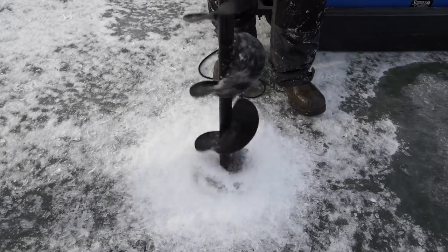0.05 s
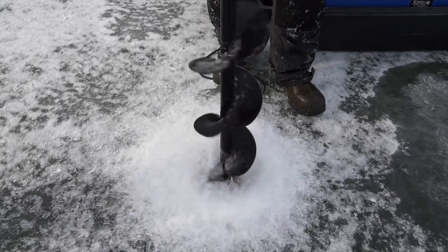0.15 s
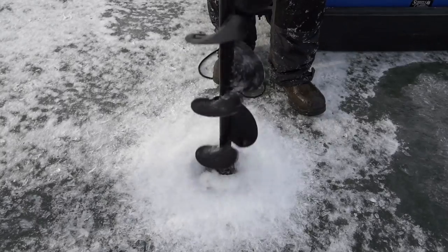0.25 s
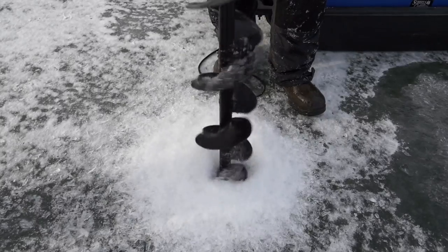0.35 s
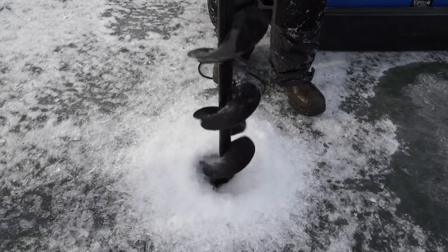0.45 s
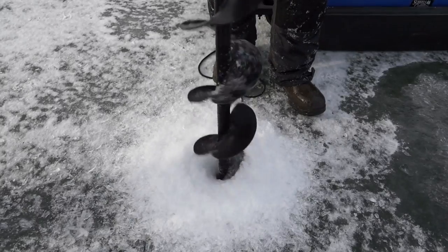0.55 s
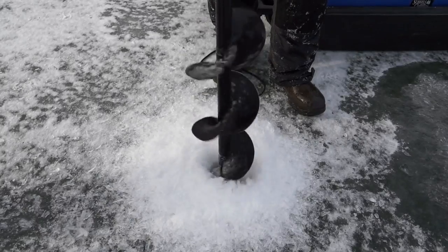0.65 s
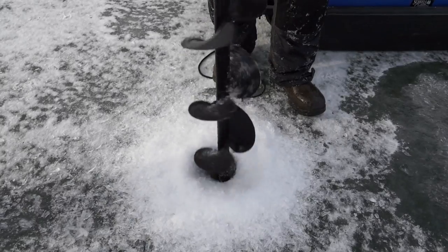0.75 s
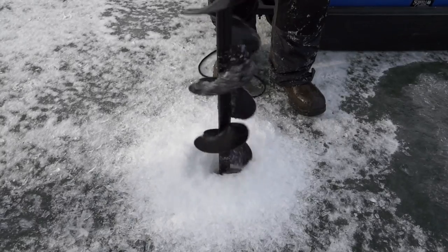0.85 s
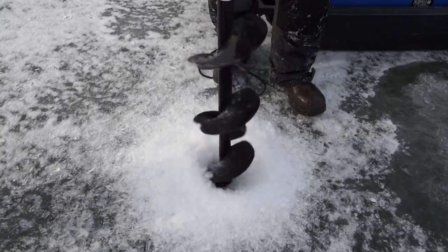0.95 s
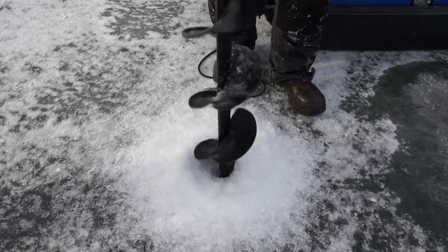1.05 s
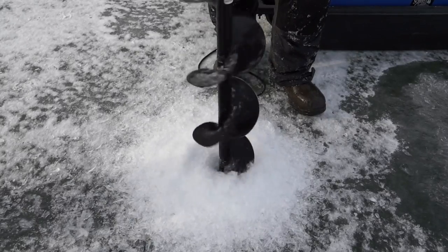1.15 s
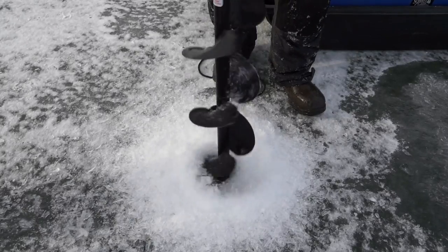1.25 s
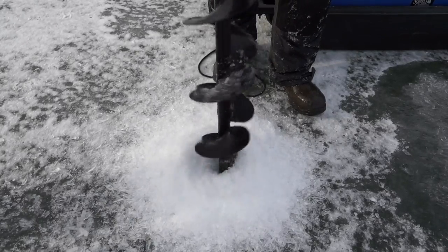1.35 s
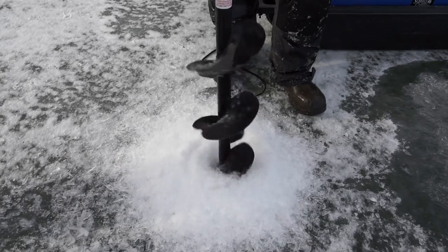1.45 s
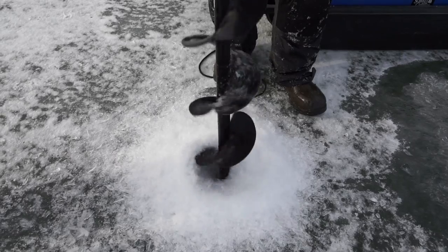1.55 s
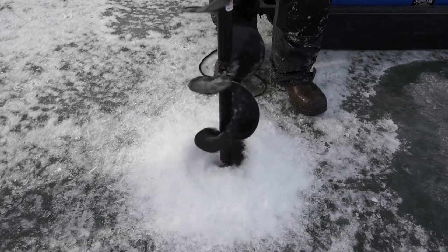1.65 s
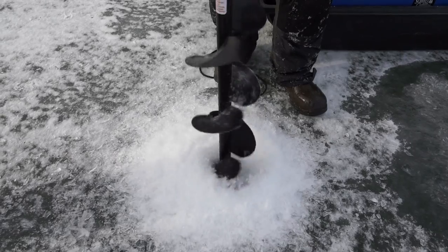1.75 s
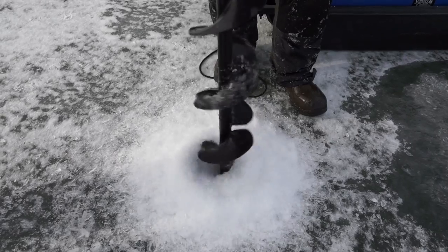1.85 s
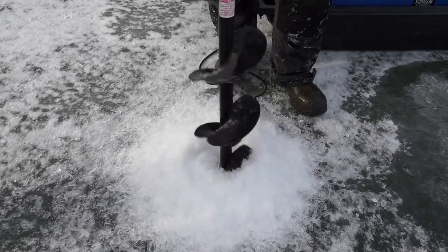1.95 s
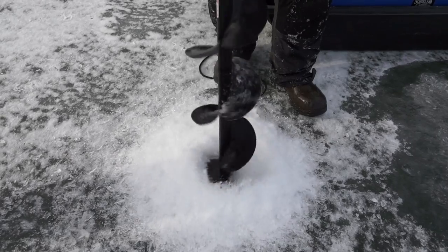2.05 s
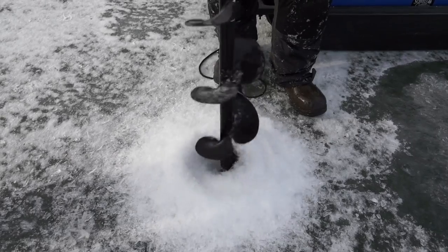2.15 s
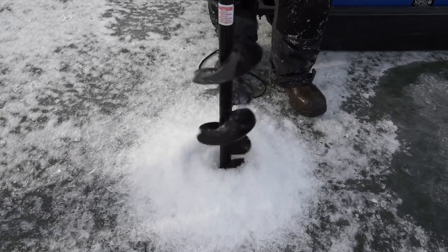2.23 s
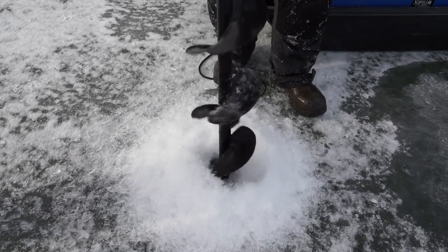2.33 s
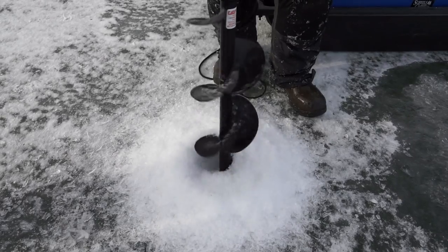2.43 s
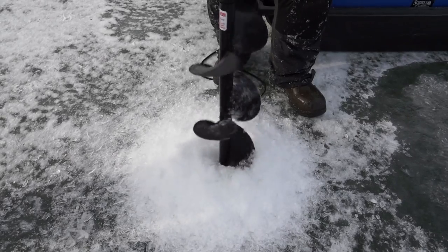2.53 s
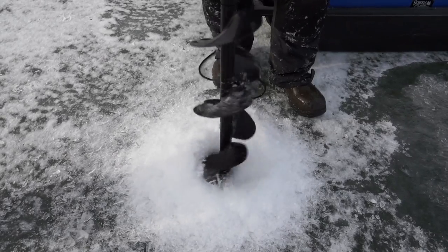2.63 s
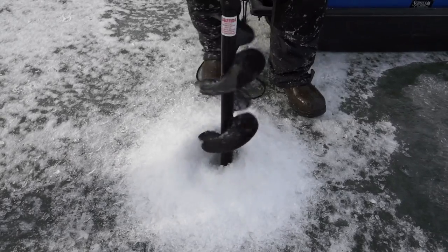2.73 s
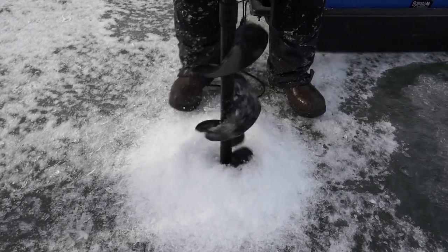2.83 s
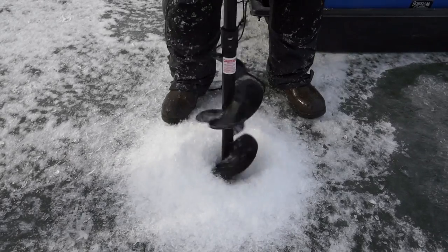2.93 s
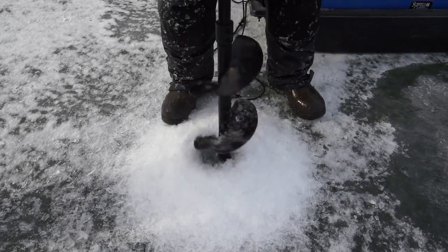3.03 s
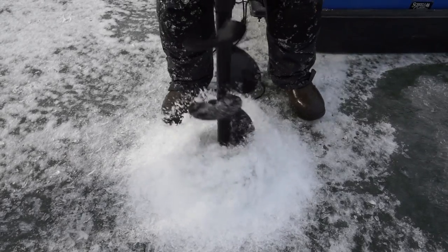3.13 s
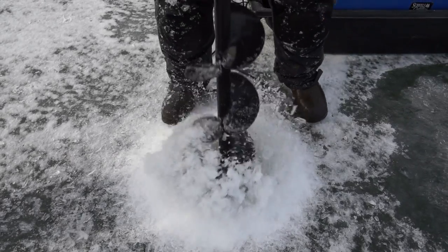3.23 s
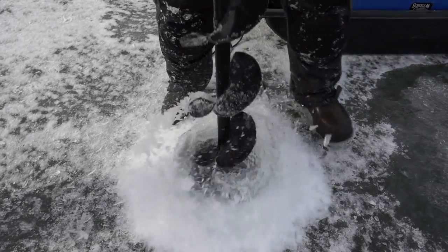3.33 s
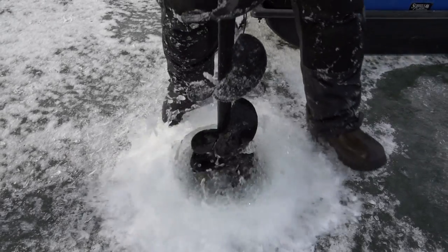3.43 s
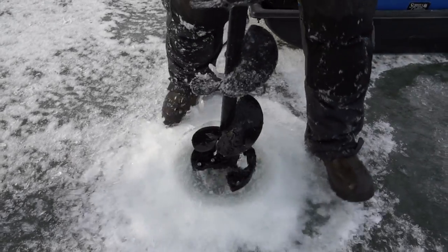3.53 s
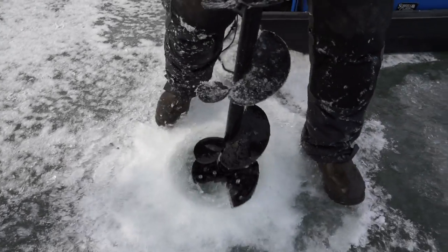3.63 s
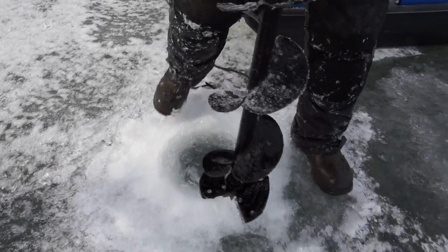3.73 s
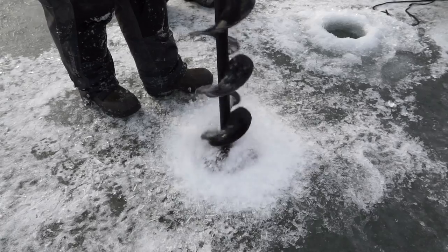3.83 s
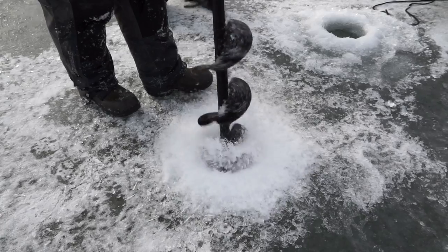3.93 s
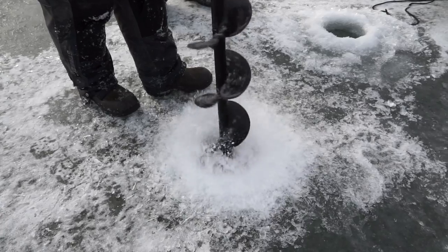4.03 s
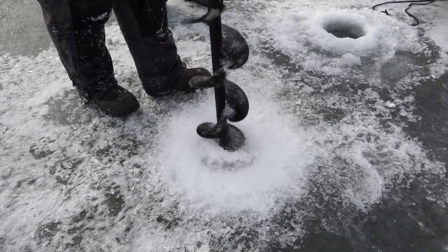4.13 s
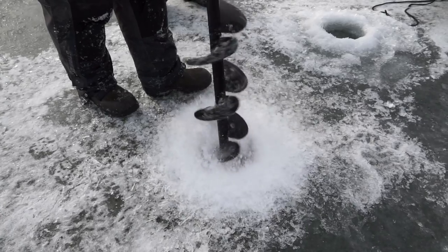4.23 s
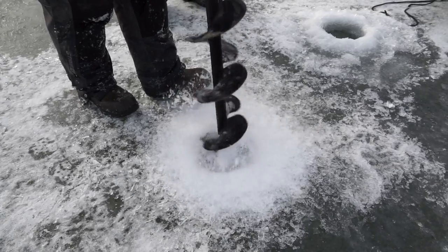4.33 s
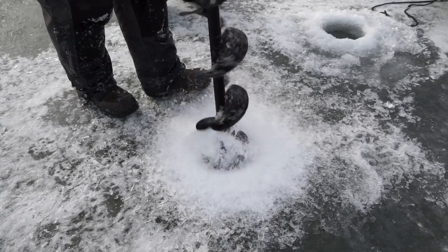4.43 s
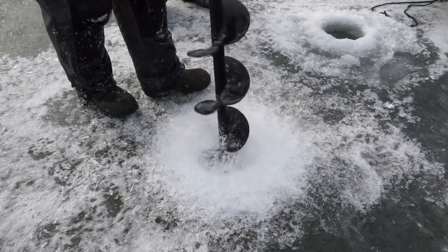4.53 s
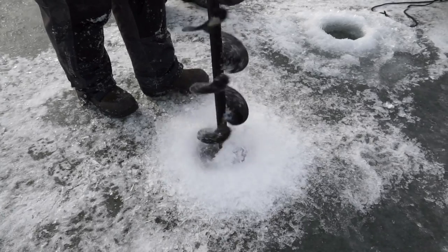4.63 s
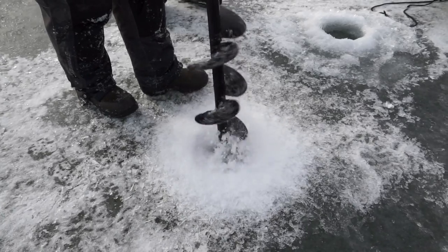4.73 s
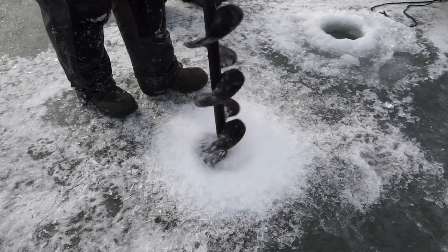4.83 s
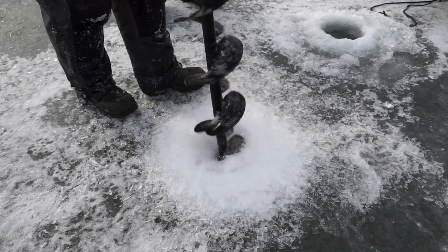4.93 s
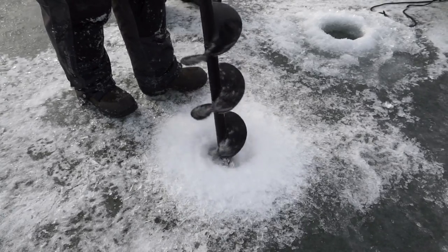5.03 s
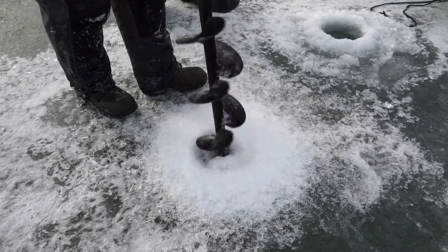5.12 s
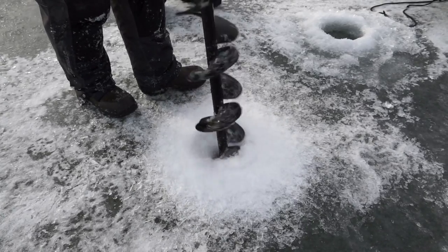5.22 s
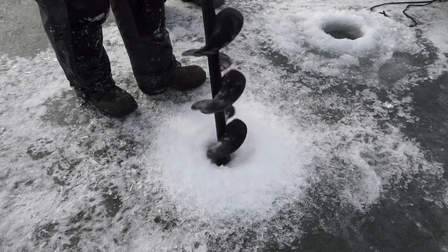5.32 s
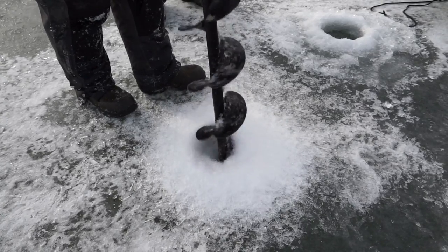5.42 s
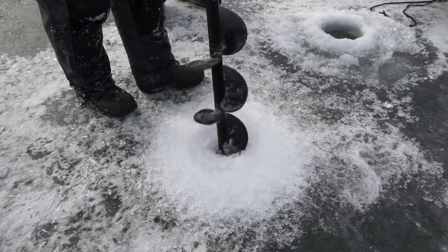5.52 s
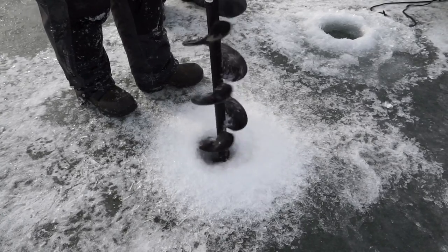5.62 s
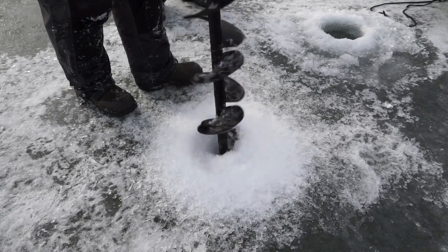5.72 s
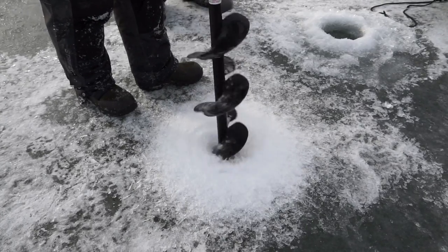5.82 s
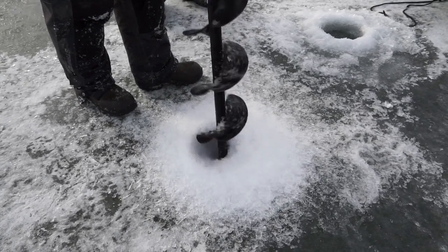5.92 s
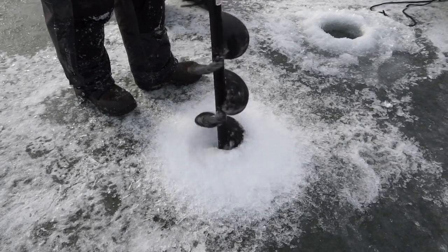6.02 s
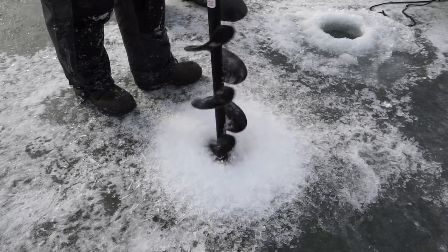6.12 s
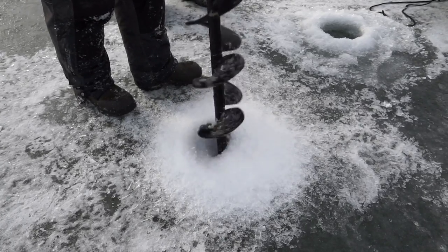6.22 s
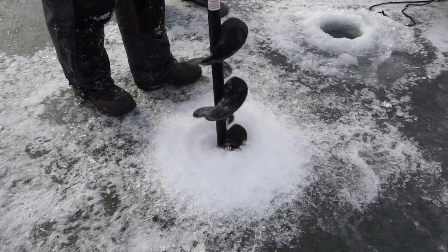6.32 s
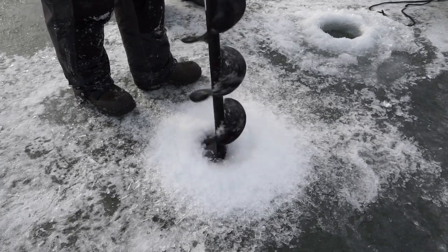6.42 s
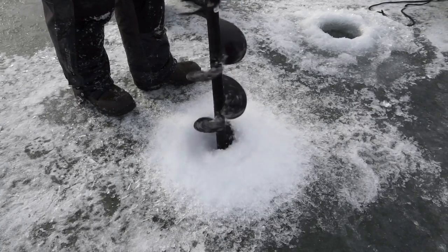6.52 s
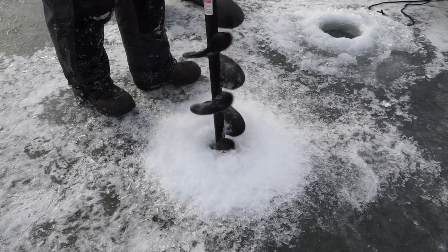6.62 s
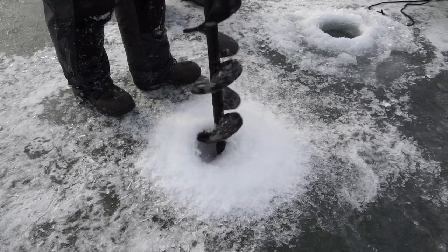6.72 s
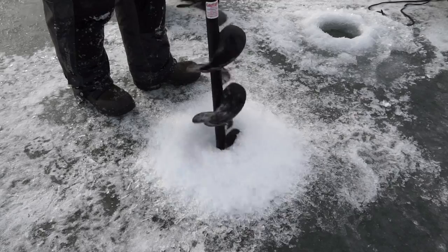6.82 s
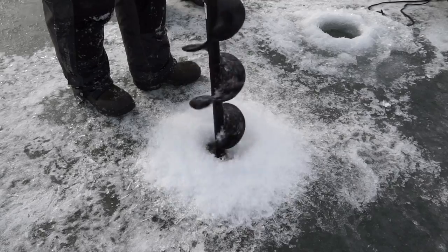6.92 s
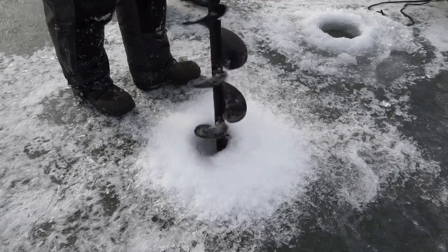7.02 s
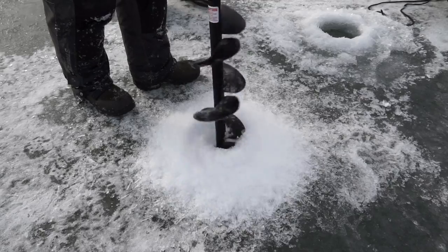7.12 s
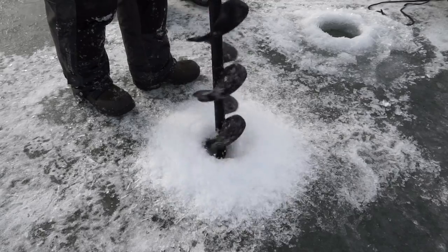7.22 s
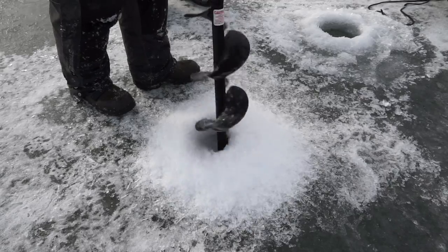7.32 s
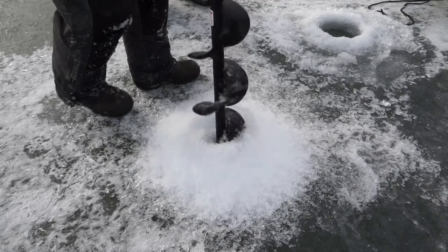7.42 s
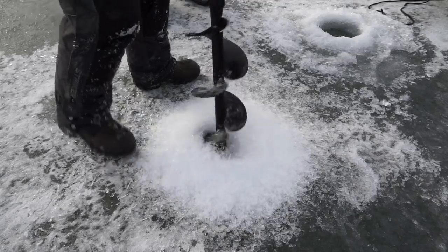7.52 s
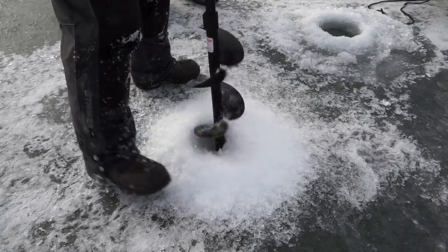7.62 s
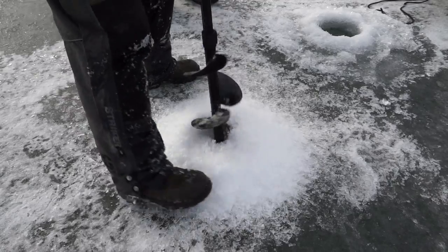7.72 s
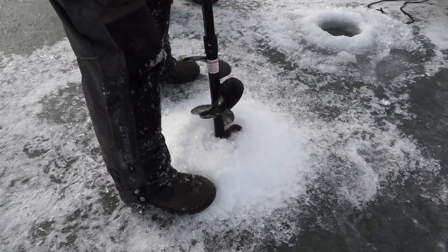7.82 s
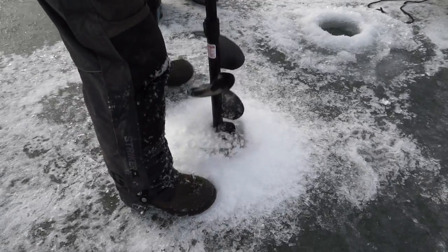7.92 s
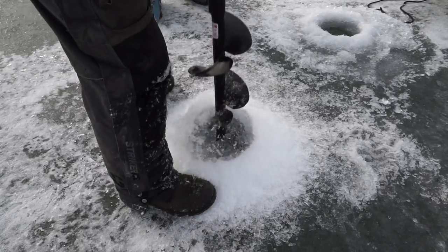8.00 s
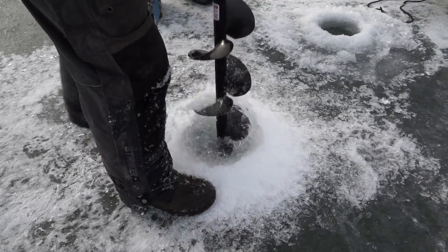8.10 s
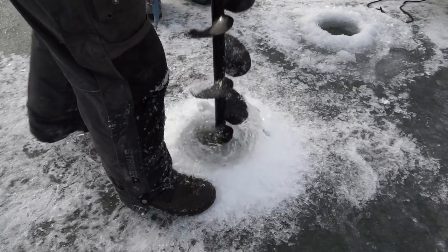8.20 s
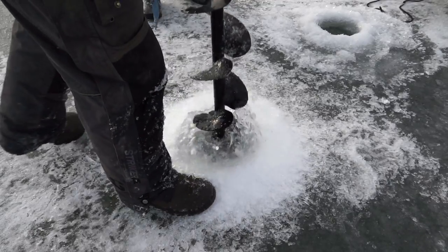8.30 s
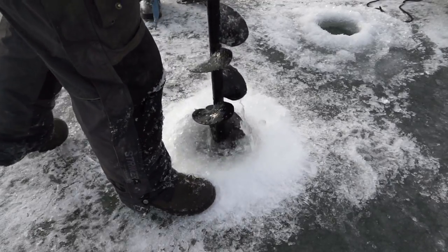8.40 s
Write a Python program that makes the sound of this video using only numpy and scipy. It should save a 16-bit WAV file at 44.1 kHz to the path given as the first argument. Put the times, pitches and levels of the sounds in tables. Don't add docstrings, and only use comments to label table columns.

```python
import sys
import numpy as np
from scipy import signal
from scipy.io import wavfile

SR = 44100
rng = np.random.default_rng(int(sys.argv[2]) if len(sys.argv) > 2 else 0)


def convert_level_to_amplitude(level_db):
    exponent = np.asarray(level_db, float) / 20
    return 10 ** exponent


def wav_out(sig):
    wavfile.write(sys.argv[1], SR, np.round(np.clip(np.atleast_2d(sig).T, -1, 1) * 32767).astype(np.int16))


N = 373085


def rms_one(x):
    return x / np.sqrt(np.mean(x ** 2) + 1e-20)


def in_time(rows, fade_s=.012):
    s, *columns = np.transpose(rows)
    part = slice(max(int((s[0] - fade_s) * SR), 0), min(int((s[-1] + fade_s) * SR), N))
    t = np.arange(part.start, part.stop) / SR
    since_start = t - s[0] + (s[0] < fade_s)
    gate = np.clip(np.minimum(since_start, s[-1] - t) / fade_s / 2 + .5, 0, 1)
    return part, np.sqrt(gate), [np.interp(t, s, c) for c in columns]


def at_hz(points, hz):
    table_hz, value = np.array(points).T
    return np.interp(np.log(hz), np.log(table_hz), value)


def coarse(rate_hz, size):
    r = np.exp(-32 * np.pi * rate_hz / SR)
    slow = signal.lfilter([1], [1, -2 * r, r * r], rng.standard_normal(size // 16 + 3001))[3000:]
    return rms_one(slow - slow.mean())


def drift(rate_hz, size):
    slow = coarse(rate_hz, size)
    return np.interp(np.arange(size) / 16, np.arange(len(slow)), slow)


def bumps(t, rows, width_s):
    s, *columns = np.transpose(rows)
    return np.array(columns) @ np.exp(-.5 * ((t - s[:, None]) / width_s) ** 2)


def resonance(x, hz, t60_s):
    r, w = convert_level_to_amplitude(-60 / (t60_s * SR)), 2 * np.pi * hz / SR
    return signal.lfilter([.5, 0, -.5], [1, -2 * r * np.cos(w), r * r], x + 1e-18)


# frequency in Hz, left minus right in dB.
LEAN_DB = [(60, 5), (150, 1.5), (380, -2), (950, -2.5), (2380, -6), (5980, -4.0), (15000, -9)]


def leaned(x, hz):
    return x * convert_level_to_amplitude(at_hz(LEAN_DB, hz) / 2 * np.array([[1], [-1]]))


# blades touch in s, bite-in time in s, ice gives in s, through in s, grind in dB.
HOLES = [
    (-.2, 0.085, 2.86, 2.9, -18),
    (3.862, 0.057, 7.5, 7.643, -18),
]
# thud, rumble, hiss at the top in dB, then their change to the bottom in dB.
VOICING_DB = [
    (-46, -17, -9.5, 20.8, 3.1, -0.74),
    (-39, -16, -8.5, 10, 2.2, -1.3),
]
# thud, rumble, grind, hiss in dB.
GIVE_DB = [
    (3, 8.9, -9, -4),
    (12, 5.8, -9.5, -7.5),
]
# time in s, jolt in dB, extra thud in dB.
CATCHES = [(.07, 7, 9), (.32, 7.5, 5), (.58, 4, 3), (.83, 5.5, 3), (1.05, 2.5, 0), (1.34, 4, 1),
           (1.6, 2, 2), (1.95, 2, -1), (2.25, 5, -2), (2.49, 3, 4), (2.68, 3, 4), (4.21, 6.5, 10),
           (4.38, 9, 11), (4.58, 9, 6), (4.9, 3, 0), (5.139, 3.5, -1), (5.36, 4.5, 2), (5.47, 0, 12.5),
           (5.62, 1.5, -6), (5.869, 2.5, 3), (6.06, 0, 5), (6.31, 1.5, -1), (6.552, 0, -1),
           (6.92, 4.5, 2.5), (7.1, 3, 4)]
# time in s, level change in dB.
SLACKS = [(.26, -1.5), (.9, -1.5), (1.17, -1.5), (1.42, -1.5), (1.87, -0.5), (2.36, 1), (3.93, -3.5),
          (4.0, -2), (4.07, -2), (4.42, -1.5), (4.67, -4), (4.95, -1.5), (5.3, -1.5), (6.85, -1)]
CATCH_S, CATCH_SHARE = 0.041, (0.46, 1.0, 0.14, 0.072)
SLACK_S, SLACK_SHARE = 0.032, (1.8, 0.92, 1, 1.3)
DEEPEN_POWER = 1.2
RIM_HISS_DB, RIM_S = 3.5, 0.27


def blades(hole):
    start, bite_s, give, end, grind_db = HOLES[hole]
    t = np.arange(max(start, 0), end, .005)
    depth = np.clip((t - start) / (give - start), 0, 1) ** DEEPEN_POWER
    top_db, change_db = np.insert(np.reshape(VOICING_DB[hole], (2, 3)), 2, 0, axis=1)
    jolt_db, thud_db = bumps(t, CATCHES, CATCH_S)
    slack_db = bumps(t, SLACKS, SLACK_S)[0]
    bite_db = -30 * np.exp(-(t - start) / bite_s * 2.8)
    db = grind_db + bite_db + top_db[:, None] + np.outer(change_db, depth)
    db += np.outer(CATCH_SHARE, jolt_db) + np.outer(SLACK_SHARE, slack_db)
    db += np.outer(GIVE_DB[hole], np.clip((t - give) / (end - give), 0, 1))
    db[0] += thud_db
    db[3] += RIM_HISS_DB * np.exp(-(t - start) / RIM_S)
    return np.c_[t, db.T]


# frequency in Hz, left-right likeness from 0 to 1.
LIKENESS = [(60, 0.88), (150, 0.98), (380, 0.96), (950, 0.95), (2380, 0.99), (5980, 0.39), (15000, 0.17)]
GROUP_HZ = [240, 800, 3200]
FLICKER_PER_S = 24


def grains(rows, colour, ring_db, per_s, spread_db, bed, surge_db, patchy_db):
    part, gate, levels_db = in_time(rows)
    size = len(gate)
    cracks = convert_level_to_amplitude(spread_db * np.minimum(rng.exponential(1, size), 4)) * (rng.random(size) < per_s / SR)
    white = rng.standard_normal((2, 2, size)) * (bed + rms_one(cracks))
    surge = surge_db * (drift(7.2, size) + 0.6 * drift(33, size))
    groups = np.zeros((4, 2, size))
    edges = 50 * 2 ** np.arange(0, 8.6, 1 / 3)
    for k, (low, high) in enumerate(zip(edges, edges[1:])):
        band = signal.butter(2, [low, high], "band", fs=SR, output="sos")
        mid, side = signal.sosfilt(band, white[k % 2])
        hz = np.sqrt(low * high)
        alike = np.clip(at_hz(LIKENESS, hz), 0, 1)
        pair = np.sqrt(1 + alike) * mid + np.sqrt(1 - alike) * side * [[1], [-1]]
        band_db = at_hz(colour, hz) + patchy_db * drift(FLICKER_PER_S, size)
        groups[np.searchsorted(GROUP_HZ, hz)] += leaned(pair * convert_level_to_amplitude(band_db), hz)
    shaft = rms_one(resonance(white[0, 0], hz=1108.5, t60_s=0.075))
    groups[2] += leaned(shaft, 910) * convert_level_to_amplitude(ring_db) * np.std(groups[2])
    mixed = sum(convert_level_to_amplitude(db) * g / np.std(g.mean(axis=0)) for db, g in zip(levels_db, groups))
    out = np.zeros((2, N))
    out[:, part] = gate * convert_level_to_amplitude(surge) * mixed
    return out


def squeaks(rows, level_db, per_s, cycles, low_hz, high_hz):
    part, gate, levels_db = in_time(rows)
    out, size = np.zeros((2, N)), len(gate)
    born = (rng.random(size) < per_s / SR) * convert_level_to_amplitude(2.1 * rng.standard_normal(size))
    dealt = rng.integers(0, 20, size)
    for k, hz in enumerate(np.geomspace(low_hz, high_hz, 20)):
        ring = resonance(born * (dealt == k), hz, cycles / hz)
        ring = resonance(ring, hz, cycles / hz)
        out[:, part] += leaned(ring * hz, hz)
    out[:, part] *= convert_level_to_amplitude(levels_db[2] + level_db) * gate / np.std(out[:, part].mean(axis=0))
    return out


# frequency in Hz, density in dB per Hz.
CUT_COLOUR = [
    [(35, -86), (60, -46), (231, -32.5), (413, -16.5), (889, -13.5), (999, -5), (1120, -2.5), (1350, -9.5),
     (2310, -8.5), (3190, -20.5), (4030, -21), (5450, -26.5), (9510, -32), (15500, -47)],
    [(35, -75), (60, -36), (413, -9.5), (585, -3), (756, -9), (1170, -4), (1960, -5), (2150, -4),
     (2980, -14.5), (3340, -10), (4120, -17), (4960, -14), (7030, -17.5), (15500, -33)],
]
RING_DB = (-9.0, -18.0)
SQUEAK_DB = (-20, -13)


def cutting(hole):
    levels = blades(hole)
    grind = grains(levels, CUT_COLOUR[hole], RING_DB[hole], per_s=2000, spread_db=2.5, bed=2.15,
                   surge_db=0.76, patchy_db=1.58)
    return grind + squeaks(levels, SQUEAK_DB[hole], per_s=260, cycles=42.0, low_hz=1000, high_hz=2582)


# peak in dB, swell up to the peak in dB, share of depth where it peaks.
WHINE = [
    (-23.0, 0, 0.34),
    (-29.5, 7.5, 0.76),
]
TURNS_PER_S, TURN_DB, TURN_PHASE = 4.0, (1.0, 1.5), (0.23, 0.32)


def load(hole):
    peak_db, swell_db, top = WHINE[hole]
    depth = np.linspace(0, 1, 200)
    start, end = SPEED[hole][0][0], SPEED[hole][-1][0]
    away = np.where(depth < top, (top - depth) / top, (depth - top) / (1 - top) * 0.97)
    t = start + (end - start) * depth
    swing_db = TURN_DB[hole] * np.sin(2 * np.pi * (TURNS_PER_S * t + TURN_PHASE[hole]))
    return np.c_[t, peak_db - swell_db * away ** 2.5 + swing_db]


# time in s, teeth per s.
SPEED = [
    [(0, 588), (.4, 587), (.5, 594), (.82, 591), (.92, 580), (1.15, 585), (1.55, 578), (1.9, 581),
     (2.15, 573), (2.45, 573), (2.75, 584), (2.89, 598)],
    [(3.9, 593), (4.45, 586), (4.82, 600), (5.05, 586), (5.28, 582), (5.46, 597), (5.7, 592), (5.86, 584),
     (6.3, 584), (6.55, 589), (6.9, 594), (7.02, 581), (7.15, 591), (7.38, 579), (7.48, 606), (7.63, 615)],
]
SAG_PER_DB = 1.3


def speed(hole):
    s, teeth = np.transpose(SPEED[hole])
    t = np.arange(s[0], s[-1] + .004, .005)
    sag = SAG_PER_DB * bumps(t, CATCHES, CATCH_S)[0]
    return np.c_[np.minimum(t, s[-1]), np.interp(t, s, teeth) - sag]


# multiple of the tooth rate, first hole in dB, second hole in dB, free in dB.
MESH = [(1, -21.5, -8, -13), (2, -0.5, 2.5, -3), (3, -9, -5, 2.5), (4, -9, -4, -4.5), (5, -12, -1.5, -7),
        (6, -13.5, -25, -13), (7, -17.5, -4, -12), (8, -19.5, -26, -22), (10, -21.5, -26, -10.5),
        (12, -25, -12.5, -20), (14, -30, -42, -36)]
WHEEL_TEETH = 40
THROBBING, THROB = 7, .8


def gears(teeth_rows, rows, column, wobble, blur_hz, rough, runout, pinion, patchy_db, spread):
    part, gate, (whine_db,) = in_time(rows)
    teeth, size = in_time(teeth_rows)[2][0], len(gate)
    turn = 2 * np.pi * np.cumsum(teeth * (1 + wobble * drift(22, size))) / SR
    coarse_turn = np.r_[turn, turn[-16:]][::16][:size // 16 + 1]
    wheel = np.exp(1j * np.outer(np.arange(1, 5), coarse_turn / WHEEL_TEETH))
    out = np.zeros((2, N))
    for row in MESH:
        k = row[0]
        depth = runout * np.array([k - 1, .5 * k, pinion / runout, 0.44 * k])
        up, down = depth * np.exp(2j * np.pi * rng.random((2, 4)))
        blur = coarse(blur_hz, size) + 1j * coarse(blur_hz, size)
        smear = 1 + .5 * up @ wheel + down @ wheel.conj() + rough * (abs(k - 2) + .6) * blur
        smear *= convert_level_to_amplitude(patchy_db * min(abs(k - 2), 4) * coarse(15, size))
        smear *= 1 + THROB * (k == THROBBING) * wheel[0].real
        apart = np.exp(1j * spread * k * coarse(blur_hz, size) * np.array([[1], [-1]]))
        shape = apart * smear / np.sqrt(np.mean(np.abs(smear) ** 2))
        shape = np.repeat(shape, 16, axis=1)[:, :size]
        carrier = np.exp(1j * k * turn) * convert_level_to_amplitude(row[column] + whine_db) * gate
        line = np.sqrt(2) * np.real(shape * carrier)
        out[:, part] += leaned(line, k * teeth.mean())
    return out


WOBBLE, RUNOUT = (.003, .007), (.15, .12)
BLUR_HZ, ROUGH, LINE_PATCHY_DB = (35, 70), (.12, .27), (.45, .35)


def loaded_whine(hole):
    return gears(speed(hole), load(hole), 1 + hole, wobble=WOBBLE[hole], blur_hz=BLUR_HZ[hole],
                 rough=ROUGH[hole], runout=RUNOUT[hole], pinion=.35, patchy_db=LINE_PATCHY_DB[hole], spread=.04)


# time in s, teeth per s.
FREE_SPEED = [
    [(2.89, 686), (3.1, 686), (3.22, 672)],
    [(7.65, 692), (7.82, 693), (7.91, 684)],
]
# time in s, level in dB.
FREE_DB = [
    [(2.89, -31), (2.99, -34), (3.02, -26), (3.11, -29.5), (3.15, -43), (3.22, -50)],
    [(7.65, -40), (7.71, -33.5), (7.81, -34), (7.86, -42), (7.91, -43)],
]


def free_whine(hole):
    return gears(FREE_SPEED[hole], FREE_DB[hole], 3, wobble=.004, blur_hz=90, rough=.35, runout=.12,
                 pinion=.4, patchy_db=1.3, spread=.04)


# time in s, level in dB.
CHURN_DB = [
    [(2.89, -29), (2.98, -27), (3.05, -23), (3.28, -28.5), (3.41, -28.5), (3.49, -42.5), (3.61, -35),
     (3.8, -42), (3.88, -40)],
    [(7.64, -29.5), (7.885, -27.5), (7.92, -32), (8.04, -33.5), (8.12, -29.5), (8.22, -32.5), (8.33, -38),
     (8.378, -28), (8.46, -47)],
]
# time in s, level change in dB.
LULLS = [(3.21, 2), (3.24, -5), (7.965, -3), (8.047, -3), (8.097, -7), (8.143, -10), (8.305, -3), (8.34, 4)]
# from s, to s, thud in dB, slosh gain in dB.
PUMPING = [
    (3.2, 3.44, -42.5, 5.5),
    (8.04, 8.37, -45, 7.5),
]
# until s, level in dB, drain in dB per s, trickle in dB.
RUNOFF = [
    (3.67, -38, 60, -47),
    (7.89, -38, 200, -45.5),
]
# time in s, level over the run-off in dB.
SPLASHES = [(3.05, 5), (3.3, -6), (3.54, 1.5), (3.65, 5.5), (8.062, 6), (8.375, 9), (3.47, -0.5)]
LULL_S, SPLASH_S, PUMP_EDGE_S = 0.0058, 0.012, 0.013
THUD_BELOW_DB, SLOSH_BELOW_DB = -19.5, -8.5


def water(hole):
    s, churn_db = np.transpose(CHURN_DB[hole])
    t = np.arange(s[0], s[-1], .004)
    churn = np.interp(t, s, churn_db) + bumps(t, LULLS, LULL_S)[0]
    start, end, thud_db, slosh_db = PUMPING[hole]
    pumped = np.clip(np.minimum(t - start, end - t) / PUMP_EDGE_S + .5, 0, 1)
    thud = (churn + THUD_BELOW_DB) * (1 - pumped) + thud_db * pumped
    slosh = churn + SLOSH_BELOW_DB + slosh_db * pumped
    until, spray_db, drain, trickle_db = RUNOFF[hole]
    draining = spray_db - drain * np.maximum(t - until, 0)
    spray = np.maximum(draining, trickle_db) + bumps(t, SPLASHES, SPLASH_S)[0]
    return np.c_[t, thud, slosh, churn, spray]


# frequency in Hz, density in dB per Hz.
SLUSH_COLOUR = [
    [(35, -79), (60, -59), (423, -15), (533, -29), (1100, -2.5), (1630, -11), (1870, -5.5), (3120, -17),
     (15500, -24.5)],
    [(35, -78.5), (60, -56), (210, -16), (486, -4.5), (705, -10.5), (1450, -11), (1550, -8), (1960, -19.5),
     (15500, -33)],
]
CRUNCH_DB = (-9, -5)


def slush(hole):
    levels = water(hole)
    wash = grains(levels, SLUSH_COLOUR[hole], RING_DB[hole] - 1.5, per_s=900, spread_db=3.5, bed=2.2,
                  surge_db=1.5, patchy_db=1.5)
    crunch = squeaks(levels, CRUNCH_DB[hole], per_s=160, cycles=13.5, low_hz=655, high_hz=2880)
    return convert_level_to_amplitude(0.5) * wash + crunch


# time in s, peak in dB,
# centre in Hz, tick in dB.
SLAPS = [(2.870, -7, 1050, -23.5), (3.074, -13.5, 2020, -21), (3.13, -12, 1070, -24),
         (3.17, -12, 1130, -21), (3.218, -7.5, 1150, -14), (3.248, -18, 1120, -16), (3.267, -13, 1230, -26),
         (3.288, -20, 999, -10), (3.298, -15, 1120, -28), (3.321, -21, 1120, -21), (3.385, -14, 1090, -24),
         (3.406, -9.5, 1090, -22), (3.61, -21, 1740, -15), (7.565, -8.5, 1200, -23), (7.604, -8, 1240, -20),
         (7.724, -17, 2080, -18), (7.819, -18, 1590, -20), (7.853, -19, 834, -22), (7.996, -23, 1650, -22),
         (8.058, -17, 1100, -22), (8.108, -23, 1280, -18), (8.114, -17.5, 1410, -23),
         (8.153, -12.5, 1270, -18), (8.19, -18, 1530, -22), (8.207, -22, 1300, -17),
         (8.231, -25, 1380, -21), (8.353, -18, 1200, -17), (8.365, -14, 923, -18), (8.376, -17, 950, -6),
         (3.444, -21, 1130, -25), (3.519, -32, 955, -25), (8.226, -33, 1500, -10)]
# time in s, peak in dB, centre
# in Hz, tick in dB.
BITES = [(2.767, -13, 1140, -25), (2.797, -17, 1200, -25), (2.821, -13, 1100, -23),
         (2.855, -7.5, 1230, -25), (2.861, -16, 1900, -25), (7.453, -15, 1580, -22),
         (7.473, -18, 1600, -22), (7.489, -18, 1190, -22), (7.503, -12, 1190, -22), (7.521, -19, 1790, -22),
         (7.534, -13, 1810, -22), (7.578, -16, 1300, -22), (7.624, -17, 1320, -22), (7.633, -20, 1300, -22),
         (8.064, -20, 1000, -22), (8.13, -23, 1400, -22), (8.159, -21, 1600, -22)]
# frequency in Hz, level in dB, ring in cycles.
SLAP_BODY = [
    (470, -5.5, 6.2),
    (2580, -19.5, 33),
]
SLAP_T60_S, SLAP_CUT_HZ = .05, 4500
TICK_DB, TICK_HZ, TICK_RING_S = 2.0, 5000, .0005


def slaps():
    out, size = np.zeros((2, N + SR)), SR // 10
    t = np.arange(size) / SR
    dull = signal.butter(2, SLAP_CUT_HZ, fs=SR, output="sos")
    for s, db, hz, tick_db in SLAPS + BITES:
        crush = rng.standard_normal(size) * convert_level_to_amplitude(-60 * t / SLAP_T60_S) * np.minimum(t / 0.00065, 1)
        body = rms_one(resonance(crush, hz, 15.0 / hz))
        body += .5 * rms_one(resonance(crush, hz * 1.25, 2.9 / hz))
        for body_hz, body_db, cycles in SLAP_BODY:
            body += convert_level_to_amplitude(body_db) * rms_one(resonance(crush, body_hz, cycles / body_hz))
        body = signal.sosfilt(dull, body)
        tick = resonance(crush, TICK_HZ, TICK_RING_S) * convert_level_to_amplitude(-60 * t / 0.02)
        hit = body / np.abs(body).max() + convert_level_to_amplitude(tick_db + TICK_DB) * tick / np.abs(tick).max()
        at = round(s * SR)
        out[:, at:at + size] += leaned(convert_level_to_amplitude(db + 1.5) * hit, hz)
    return out[:, :N]


# time in s, length in s, start in Hz, end in Hz, level in dB.
GULPS = [(3.205, 0.051, 468, 498, -20), (3.262, 0.043, 430, 380, -20), (3.302, 0.029, 400, 424, -21),
         (3.323, 0.061, 450, 404, -16), (3.377, 0.038, 369, 428, -11), (3.408, 0.029, 420, 456, -14),
         (3.513, 0.015, 1070, 860, -23), (3.606, 0.011, 434, 458, -31), (2.221, 0.048, 452, 446, -22),
         (7.553, 0.037, 428, 430, -17), (7.593, 0.027, 373, 415, -15), (8.225, 0.061, 475, 515, -27),
         (8.35, 0.018, 436, 470, -12), (8.363, 0.032, 474, 476, -13.5), (8.394, 0.028, 460, 430, -28)]


def gulps():
    out = np.zeros((2, N))
    for s, length_s, start_hz, end_hz, db in GULPS:
        size = round(length_s * SR)
        share = np.linspace(0, 1, size)
        turn = 2 * np.pi * np.cumsum(start_hz + (end_hz - start_hz) * share) / SR
        swell = np.sin(np.pi * share) ** 0.86 * convert_level_to_amplitude(db - 4.0 + 2.0 * drift(59, size))
        tone = swell * (np.sin(turn) + 0.28 * np.sin(2 * turn + 0.7))
        at = round(s * SR)
        out[:, at:at + size] += leaned(tone, start_hz)
    return out


# time in s, peak in dB, ring in Hz, ring in cycles.
DROPS = [(3.176, -28, 14000, 6), (3.2474, -17, 10500, 5), (3.2878, -19, 6000, 3), (3.3238, -28, 11200, 25),
         (3.4051, -19, 7240, 5), (3.5233, -20, 9370, 20), (3.5517, -21, 7610, 25), (3.725, -36, 9000, 4),
         (7.9862, -37, 7180, 8), (8.0566, -26, 11000, 6), (8.072, -35, 12000, 5), (8.086, -35, 12500, 5),
         (8.1109, -26, 12600, 8), (8.1484, -27, 11000, 5), (8.2272, -27, 7530, 8), (8.3659, -25, 9790, 5),
         (8.376, -21, 5500, 4), (8.4108, -18, 7520, 6), (8.4112, -22, 13000, 8)]


def drops():
    out, size = np.zeros((2, N + SR)), SR // 40
    for s, db, hz, cycles in DROPS:
        burst = rng.standard_normal((2, size)) * convert_level_to_amplitude(-60 * np.arange(size) / SR / 0.014)
        ring = resonance(burst + burst[::-1] * .5, hz, cycles / hz)
        at = round(s * SR)
        out[:, at:at + size] += leaned(convert_level_to_amplitude(db) * ring / np.abs(ring).max(), hz)
    return out[:, :N]


def droplets(per_s, level_db):
    out = np.zeros((2, N))
    for rows in (water(0), water(1)):
        part, gate, (*_, spray_db) = in_time(rows)
        size = len(gate)
        for hz in np.geomspace(1800, 11000, 14):
            born = (rng.random(size) < per_s / 14 / SR) * convert_level_to_amplitude(1.7 * rng.standard_normal(size))
            pan = convert_level_to_amplitude(4.6 * drift(40, size) * np.array([[1], [-1]]))
            ring = resonance(born * pan, hz, 5.8 / hz)
            out[:, part] += leaned(ring, hz) * convert_level_to_amplitude(spray_db + level_db) * gate
    return out


# time in s, level in dB.
VENT_DB = [
    [(2.62, -47.5), (2.864, -31), (2.88, -40), (3.19, -38), (3.3, -54)],
    [(7.62, -50), (7.708, -37), (7.854, -44), (7.91, -65)],
]


def vent(hz, t60_s):
    out = np.zeros((2, N))
    for rows in VENT_DB:
        part, gate, (db,) = in_time(rows, fade_s=0.049)
        air = rng.standard_normal((2, len(gate)))
        lower = resonance(resonance(air, hz, t60_s), hz, t60_s)
        upper = resonance(resonance(air, hz * 1.17, t60_s), hz * 1.17, t60_s)
        out[:, part] += leaned(rms_one(lower + 0.36 * upper), hz) * convert_level_to_amplitude(db + 1.5) * gate
    return out


def breeze(level_db):
    shared, own = rng.standard_normal(N), rng.standard_normal((2, N))
    low = signal.sosfilt(signal.butter(2, 70, fs=SR, output="sos"), shared + .3 * own)
    return convert_level_to_amplitude(level_db + 4.6 * drift(6.8, N)) * rms_one(low)


def scene():
    out = np.zeros((2, N))
    for hole in range(2):
        out += cutting(hole) + loaded_whine(hole) + free_whine(hole) + slush(hole)
    out += slaps() + gulps() + drops() + droplets(per_s=300, level_db=12.5)
    return out + vent(hz=7020, t60_s=0.0029) + breeze(level_db=-63.5)


def band_limit(x):
    return signal.sosfilt(signal.butter(12, 15850, fs=SR, output="sos"), x)


def record(dry):
    rounded = 0.87 * np.tanh(dry / 0.98)
    thin = signal.sosfilt(signal.butter(2, 125, "high", fs=SR, output="sos"), rounded)
    cut = signal.sosfilt(signal.cheby2(14, 60, 16500, fs=SR, output="sos"), thin)
    lag_samples = .45
    near, far = 1 - lag_samples, 1 + lag_samples
    cut[0] = signal.lfilter([near, far], [far, near], cut[0])
    return band_limit(cut)


dry = scene()
out = record(dry)
wav_out(out)
```